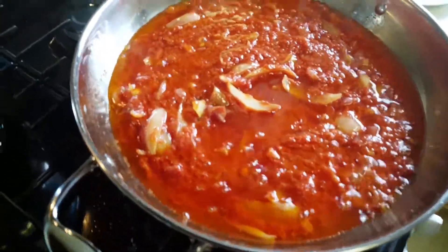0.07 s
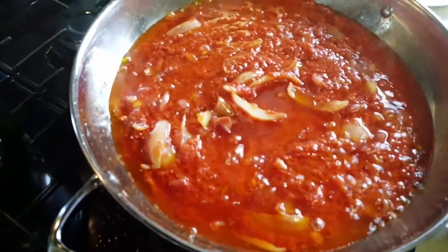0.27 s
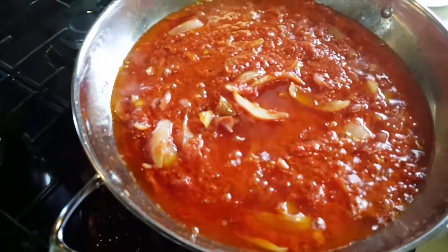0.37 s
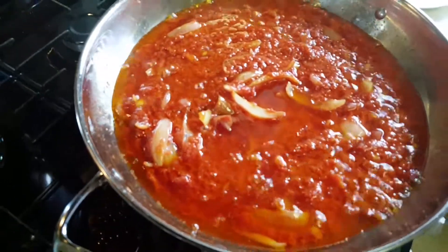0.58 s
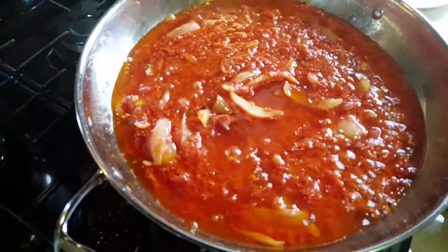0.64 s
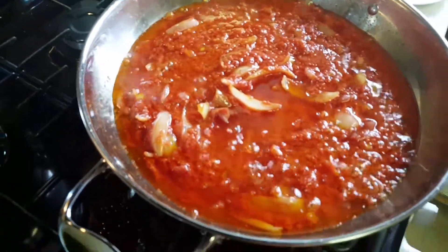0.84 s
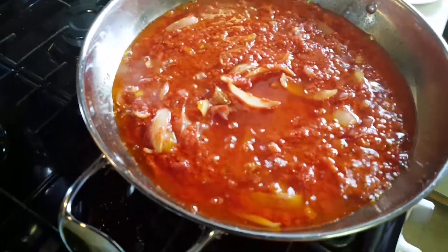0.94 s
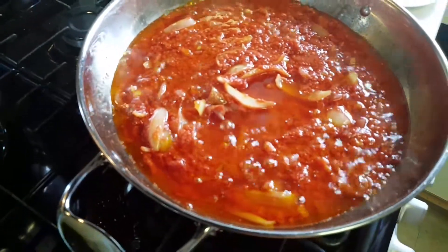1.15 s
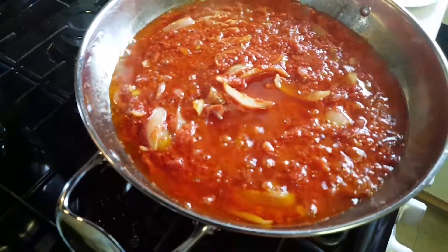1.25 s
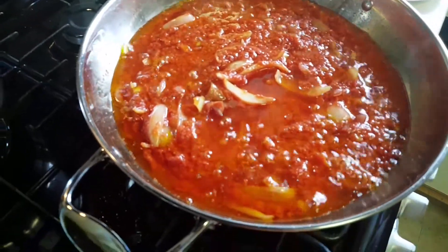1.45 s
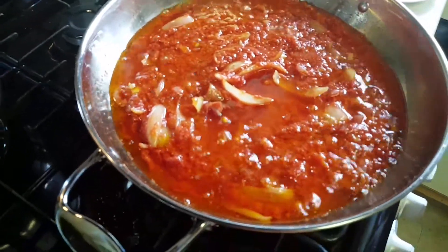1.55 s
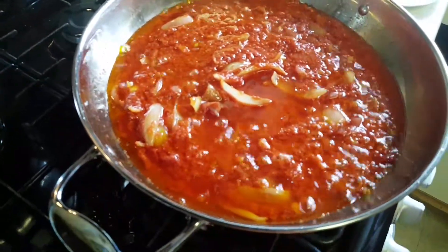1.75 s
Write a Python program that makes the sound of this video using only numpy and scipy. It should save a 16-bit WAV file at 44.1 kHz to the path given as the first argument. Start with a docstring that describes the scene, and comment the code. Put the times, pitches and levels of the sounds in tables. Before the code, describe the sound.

Close wet hiss and bubbling of thick sauce fills the right side; loud finger thumps and low grip rumble begin early on the covered left, then a steam puff, a light metallic knock and sharp spits.

```python
"""On the hob, thick tomato stew sizzles throughout in a steel pan: hiss plus damped-sine bubbles, spits and plops.
A hand-held camera takes it with the right port open and the left covered, muffled and rumbling with the grip.
From 0.25 s finger pushes thump on the left, as filtered pressure steps; the biggest make a limiter cut the gain,
which creeps back slowly. A noise puff of steam comes at 0.43 s and one light knock, clatter and ringing
steel modes, at 0.70 s; the sharpest spits, short damped sines, cluster near 1.0 s and 1.4 s."""
import sys
import numpy as np
from scipy import signal
from scipy.fft import rfft, irfft, next_fast_len
from scipy.io import wavfile
from scipy.ndimage import uniform_filter1d, minimum_filter1d, map_coordinates

SR = 44100
rng = np.random.default_rng(int(sys.argv[2]) if len(sys.argv) > 2 else 0)


def materialize(psi):
    """Save the field psi as 16-bit PCM at rate SR to the path in sys.argv[1].

    A 1-D psi becomes a single channel; in a 2-D psi each row is a channel.
    """
    bounded = np.clip(np.atleast_2d(psi).T, -1, 1)
    quanta = np.round(bounded * 32767).astype(np.int16)
    wavfile.write(sys.argv[1], SR, quanta)


N = 79380  # 1.8 s
TOP_HZ = 15400  # upper band limit

# Rumble of the grip at the covered port: t/s, level/dB
GRIP_LEVEL = [(0, -34), (.2, -25), (.4, -24.5), (.7, -27), (.92, -23), (1.2, -26.5), (1.4, -29),
              (1.53, -20.5), (1.64, -32.5), (1.8, -27.5)]
# Spectrum of that rumble: f/Hz, relative level/dB
GRIP_COLOUR = [(15, -55), (30, -8.5), (48, 1), (75, -1.5), (120, -13), (170, -22.5), (250, -30.5),
               (400, -44.5), (900, -86)]
# Finger pushes on the covered port: t/s, level/dB before the last column scales it, rise/ms,
# signed strength (positive pressing, negative letting go)
PUSHES = [(0.2452, -8.5, 0.26, 0.51), (.2450, -1.5, 1.4, 1), (0.246, 2.5, 2.53, 0.84),
          (0.3169, -10, 11.6, 1), (0.4855, -6.5, 0.83, 0.96), (.486, -2.5, 4.35, 0.91),
          (.598, 1.5, 33, -0.9), (.608, 3, 10.7, 0.5), (.7575, -6, 4.8, 0.83), (0.777, -8.5, 4.8, 0.7),
          (1.034, -3.5, 4.4, 0.77), (1.1227, -7, 0.61, 1), (1.1222, -9.5, 1.6, 0.75), (1.152, -15, 6.7, 1)]
# Skin rubbing on the covered port: t/s, starting level/dB, t60/s
RUBS = [(0.129, -44, 0.1), (.755, -39, 0.1), (1.037, -41.5, 0.1), (1.394, -41, 0.017), (1.499, -40, 0.11)]
# Broad clatter of the knock: f/Hz, relative level/dB
KNOCK_COLOUR = [(100, -10), (240, 4.5), (450, -5.5), (1000, -9.5), (2100, -8), (3500, -19), (8000, -25),
                (15000, -29)]
# Modes of the steel pan: f/Hz, level/dB before onset and decay, t60/s
STEEL_MODES = [(250.5, -43.5, 0.71), (770, -45.5, 0.46), (1820, -38.5, 0.28), (2360, -54, 0.18),
               (7070, -43, 0.19), (7100, -55, 0.16)]
# Spectrum of the steam puff: f/Hz, relative level/dB
PUFF_COLOUR = [(300, -20), (1800, -11), (2800, -7.5), (3600, -5), (4400, -8), (5800, -16), (12000, -37)]
# Larger bubbles bursting: t/s, level/dB before onset and decay, starting f/Hz, t60/s
PLOPS = [(0.144, -37, 1540, 0.054), (.292, -40, 728, 0.059), (.342, -31.5, 1530, 0.047),
         (.345, -31.5, 474, .1), (1.06, -37.5, 3420, .025), (1.528, -34, 1490, 0.027),
         (1.662, -35, 1630, 0.029)]
# Spits of hot sauce: t/s, level/dB before decay, f/Hz, t60/s
SPITS = [(0.0843, -37, 5240, 0.0026), (0.1652, -41, 8250, 0.0022), (0.1866, -28, 7000, .0012),
         (.402, -39, 9000, .0015), (.511, -31, 5180, 0.0065), (0.81, -30.5, 4640, 0.0086),
         (0.9858, -23.5, 3800, 0.0016), (.9905, -29, 4800, 0.0021), (1.0158, -25.5, 9100, 0.0018),
         (1.268, -25.5, 8070, 0.0013), (1.366, -28.5, 9700, .002), (1.4005, -34.5, 4200, 0.0052),
         (1.4015, -27, 7260, 0.0014), (1.4092, -28.5, 10100, 0.0013), (1.520, -32, 9400, 0.01),
         (1.524, -31.5, 9800, 0.0053), (1.588, -34, 6500, 0.0022), (1.706, -30.5, 8000, 0.0017)]
# Sizzle spectrum at the open right port: f/Hz, relative level/dB (per Hz)
OPEN_COLOUR = [(50, -5.7), (130, -2.3), (190, -2), (350, 0.5), (750, -4.5), (930, -7), (1170, -3.5),
               (1700, -2.4), (2050, -8), (3600, -11), (4000, -4.5), (4550, -6), (5300, -10.5), (5850, -6.5),
               (6700, -14.5), (7600, -13.5), (8350, -9.5), (9200, -14.5), (11600, -12.5), (12300, -9.4),
               (12600, -21), (13000, -2.5), (13450, -11), (13900, -13.5), (15200, -19)]
# Sizzle spectrum at the covered left port: f/Hz, relative level/dB (per Hz)
COVERED_COLOUR = [(300, -8.5), (480, -7.5), (850, -16.5), (1400, -12), (2000, -19), (3500, -24),
                  (5900, -27), (7000, -58), (8800, -42), (10500, -28), (12900, -20), (13600, -21),
                  (15000, -45)]
# How hard the stew boils: t/s, level change/dB
BOIL = [(0, 1.1), (.22, 1.27), (.4, 2), (.65, 1.5), (.9, -.5), (1.2, 0.5), (1.5, 0), (1.8, 1)]
# Swells of the small bubbles within the sizzle: t/s, level change/dB
BUBBLING = [(0, -3), (.3, 5), (.55, -1.5), (.9, -1), (1.3, -7.5), (1.53, -0.5), (1.59, -6), (1.66, 3),
            (1.8, -4.5)]
# Narrow pan resonances that tint the sizzle: f/Hz, lift/dB
PAN_TINT = [(1148, 3.5), (1812, 2), (2298, 7), (2663, 6.5), (3156, 2.5), (3280, 5), (3918, 9.5), (4501, 5),
            (5811, 5.5), (8251, 6.5), (12284, -4), (12831, 4), (13398, -8)]


def amp(db):
    """Decibels to gain."""
    return 10 ** (np.asarray(db) / 20)


def unit(x):
    """Scale to rms 1."""
    return x / np.sqrt(np.mean(x ** 2) + 1e-20)


def curve(rows):
    """Interpolate (t/s, value) rows to one value per sample."""
    return np.interp(np.arange(N) / SR, *np.transpose(rows))


def since(start_s):
    """Seconds since start_s, zero before it."""
    return np.maximum(np.arange(N) / SR - start_s, 0)


def decay(t, t60):
    """Gain that falls 60 dB in t60 seconds."""
    return amp(-60 * t / t60)


def onset(t, time_constant_s):
    """Gain that rises smoothly from 0 towards 1."""
    return 1 - np.exp(-t / time_constant_s)


def wobble(rate):
    """A smooth random curve with rate knots a second."""
    knots = rng.standard_normal(400)
    return map_coordinates(knots, [np.arange(N) * rate / SR], mode="wrap")


def coloured(x, points):
    """Filter x through a spectrum of (f/Hz, level/dB) points, at rms 1."""
    size = next_fast_len(N + SR // 2)  # padded so the filter does not wrap round
    hz, db = np.transpose(points)
    log_hz = np.log(np.fft.rfftfreq(size, 1 / SR) + 1)
    gain = amp(np.interp(log_hz, np.log(hz), db))
    return unit(irfft(rfft(x, size) * gain, size)[:N])


def noise(points):
    """Coloured noise of rms 1."""
    return coloured(rng.standard_normal(N), points)


def grains(per_s, hz, octaves, cycles, spread_db, size):
    """A random rain of damped sines, each a tiny bubble losing 60 dB in `cycles` turns, at rms 1."""
    when, pitch, chance, other = rng.random((int(per_s * N / SR), 4)).T
    # two uniform draws make pitches cluster round hz
    grain_hz = np.minimum(hz * 2 ** (octaves * (pitch + other - 1)), TOP_HZ)[:, None]
    turns = grain_hz * np.arange(size) / SR
    strength = amp(-spread_db * np.log(chance + .004))[:, None]  # few strong, many weak
    waves = strength * np.sin(2 * np.pi * turns) * decay(turns, cycles)
    at = (when * N).astype(int)[:, None] + np.arange(size)
    return unit(np.bincount(at.ravel(), waves.ravel(), N + size)[:N])


def grip_rumble():
    """The gripping hand reaches the covered port as low noise of changing level."""
    return amp(curve(GRIP_LEVEL)) * noise(GRIP_COLOUR)


def finger_pushes(scuff):
    """The microphone's low cut turns each pressure step into a thump; a fast step also scuffs."""
    low_cut = signal.butter(N=8, Wn=36.4, btype="high", fs=SR, output="sos")  # Hz
    release_s, scuff_db, scuff_t60 = 0.21, -14.5, .006
    out = np.zeros(N)
    for start_s, db, rise_ms, way in PUSHES:
        t = since(start_s)
        rise = 1 - np.exp(-(1000 * t / rise_ms) ** 2)
        step = rise * np.exp(-t / release_s)
        thump = signal.sosfilt(low_cut, step)
        thump /= np.abs(thump).max()
        # a slow step has barely risen before its scuff dies away
        skin = step * amp(scuff_db) * decay(t, scuff_t60) * scuff
        out += amp(db) * (way * thump + skin)
    return out


def rubbing(scuff):
    """Skin drags over the covered port: bursts of dull noise that start at once and fade."""
    level = np.zeros(N)
    for start_s, db, t60 in RUBS:
        t = since(start_s)
        level += (t > 0) * amp(db) * decay(t, t60)
    return level * scuff


def handling():
    """Grip, pushes and rubs at the covered port; pushes and rubs share one skin noise."""
    scuff = noise([(300, 7), (1500, -4), (4000, -15), (8000, -32), (15000, -20)])
    return grip_rumble() + finger_pushes(scuff) + rubbing(scuff)


def knock():
    """A light knock on the full pan: a soft noise clatter and damped, slightly unsteady steel modes."""
    t = since(.696)
    ring = np.zeros(N)
    for hz, db, t60 in STEEL_MODES:
        phase = 2 * np.pi * hz * t + .5 * wobble(rate=70)
        ring += amp(db) * decay(t, t60) * np.sin(phase)
    clatter = amp(-32.5) * decay(t, t60=0.31) * noise(KNOCK_COLOUR)
    return onset(t, .0025) * (ring + clatter)


def puff():
    """A pocket of steam sputters out through the sauce: noise and bubble grains that swell and fade."""
    t = since(.425)
    sputter = grains(per_s=990, hz=3430, octaves=0.53, cycles=9, spread_db=1, size=256)
    jet = coloured(rng.standard_normal(N) + sputter, PUFF_COLOUR)
    return amp(-27.5) * decay(t, t60=0.18) * onset(t, .018) * jet


def plops():
    """Larger bubbles ring softly as damped sines with a slightly rising pitch."""
    rise_per_s, attack_s = 0.33, 0.0011  # the rise is a fraction of the starting pitch
    out = np.zeros(N)
    for start_s, db, hz, t60 in PLOPS:
        t = since(start_s)
        turns = hz * t * (1 + rise_per_s * t / 2)
        out += amp(db) * decay(t, t60) * onset(t, attack_s) * np.sin(2 * np.pi * turns)
    return out


def spits():
    """Sharp damped-sine ticks, each scattered briefly by the pan wall and the hob."""
    ticks = np.zeros(N)
    for start_s, db, hz, t60 in SPITS:
        t = since(start_s)
        ticks += amp(db) * decay(t, t60) * np.sin(2 * np.pi * hz * t)
    echo_db, echo_t60 = 1, 0.1
    t = since(0)[:SR // 8]
    tail = rng.standard_normal(len(t)) * decay(t, echo_t60)
    tail /= np.linalg.norm(tail)
    return ticks + amp(echo_db) * signal.fftconvolve(ticks, tail)[:N]


def tinted(x):
    """The pan's narrow resonances lift or dip x at their own frequencies."""
    hz = np.fft.rfftfreq(N, 1 / SR)
    half_width_hz = 12
    lift_db = sum(db / (1 + ((hz - centre) / half_width_hz) ** 2) for centre, db in PAN_TINT)
    return irfft(rfft(x) * amp(lift_db), N)


def sizzle(colour):
    """Countless tiny bursts merge to a hiss; the nearer ones stand out as fizz and small bubbles."""
    hiss = rng.standard_normal(N)
    fizz = grains(per_s=1300, hz=8900, octaves=0.74, cycles=3.9, spread_db=3.5, size=128)
    bubbles = grains(per_s=700, hz=1205, octaves=1.62, cycles=4.3, spread_db=1.55, size=1024)
    mix = hiss + amp(-6) * fizz + amp(-10.5 + curve(BUBBLING)) * bubbles
    boil_db = curve(BOIL) + 0.42 * wobble(rate=14.11)
    return coloured(tinted(mix), colour) * amp(boil_db)


def scene():
    """The right port hears the pan clearly; the left hears it muffled, along with the hand."""
    hand = handling()
    pan = knock() + puff() + plops() + spits()
    cover = signal.butter(2, 3000, fs=SR, output="sos")  # low-pass, Hz
    muffled = signal.sosfilt(cover, pan)
    left = amp(-52.5) * sizzle(COVERED_COLOUR) + amp(-15.5) * muffled + hand
    right = amp(-43) * sizzle(OPEN_COLOUR) + pan + amp(-41) * hand  # a little of the hand leaks over
    return np.array([left, right])


def record(dry):
    """A limiter ducks both channels on loud peaks and recovers slowly; then the band limit."""
    ceiling, recover_db_per_s = 0.83, 0.2
    over_db = 20 * np.log10(np.maximum(np.abs(dry).max(axis=0) / ceiling, 1))
    recovery = recover_db_per_s * since(0)
    cut_db = np.maximum.accumulate(over_db + recovery) - recovery
    # hold the lowest gain round each peak, then smooth its edges
    gain = uniform_filter1d(minimum_filter1d(amp(-cut_db), size=201), size=201)
    size = next_fast_len(N + SR // 2)
    in_band = np.fft.rfftfreq(size, 1 / SR) < TOP_HZ
    return irfft(rfft(dry * gain, size) * in_band, size)[:, :N]


dry = scene()
out = record(dry)
materialize(out)
```